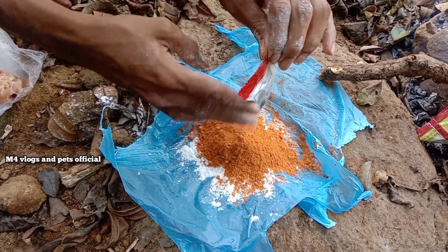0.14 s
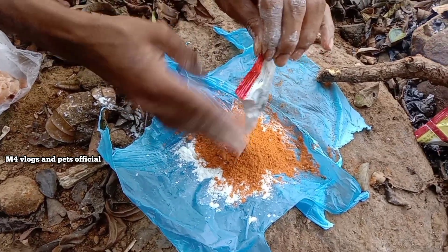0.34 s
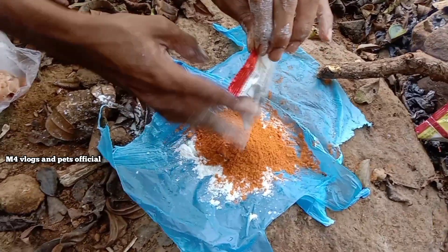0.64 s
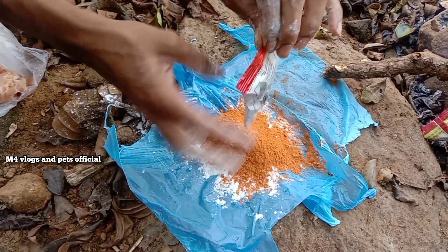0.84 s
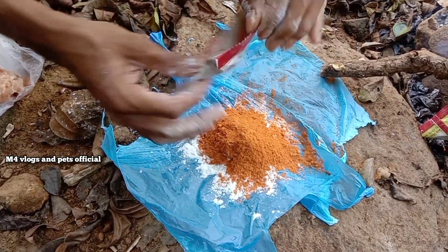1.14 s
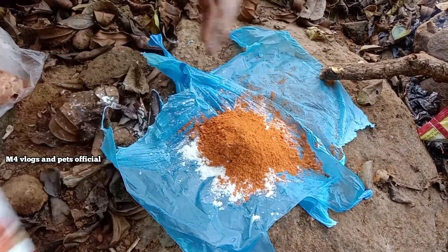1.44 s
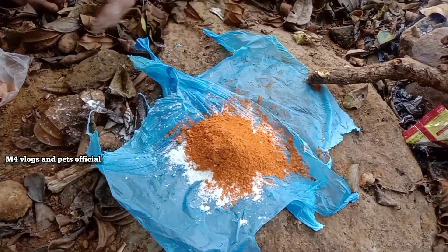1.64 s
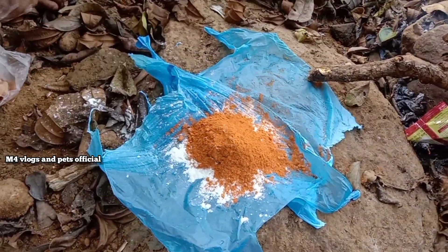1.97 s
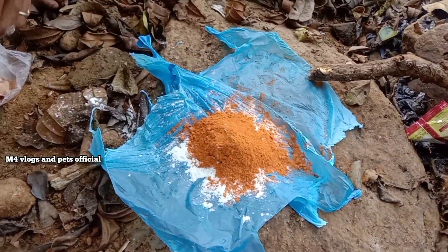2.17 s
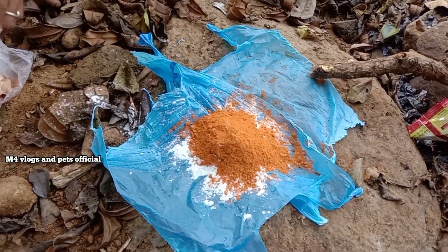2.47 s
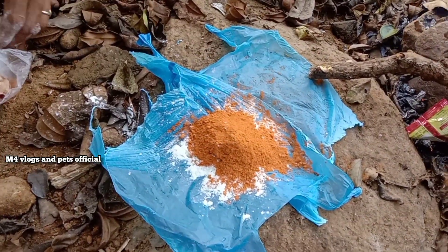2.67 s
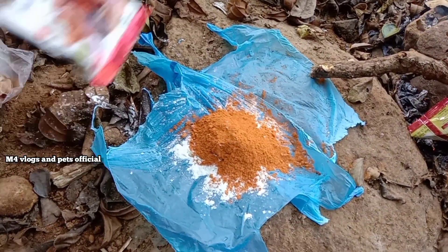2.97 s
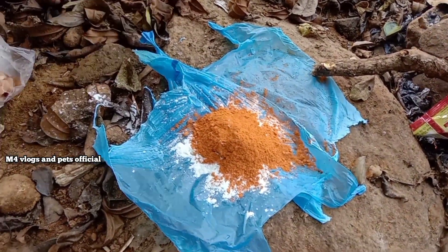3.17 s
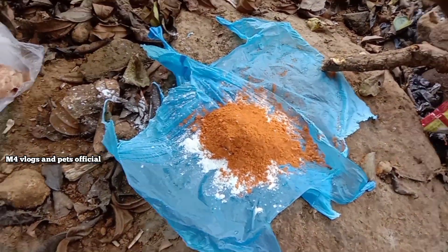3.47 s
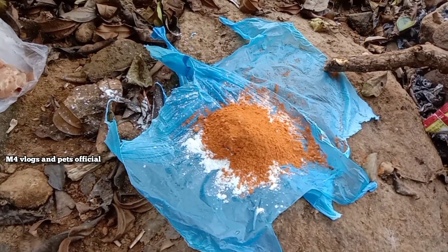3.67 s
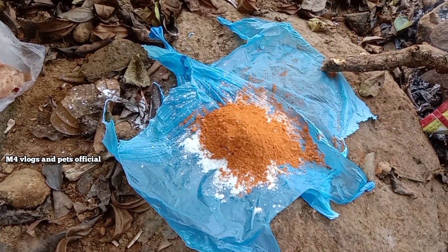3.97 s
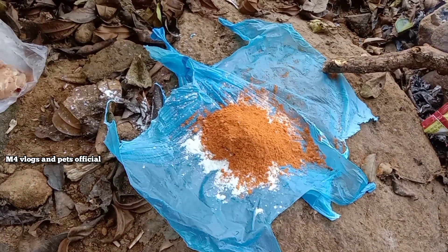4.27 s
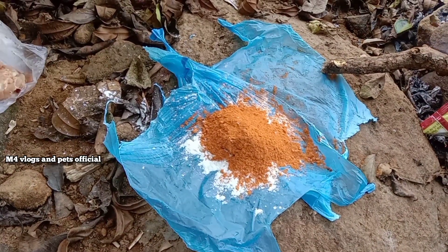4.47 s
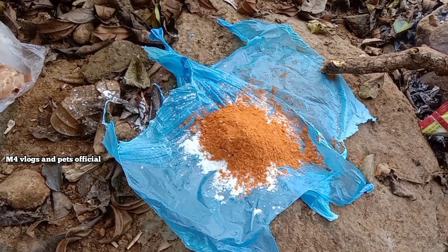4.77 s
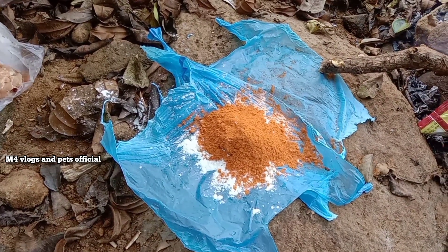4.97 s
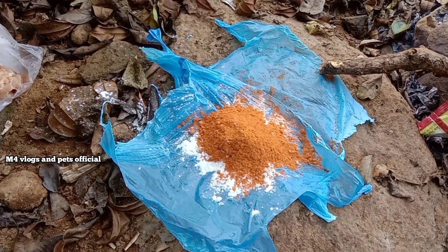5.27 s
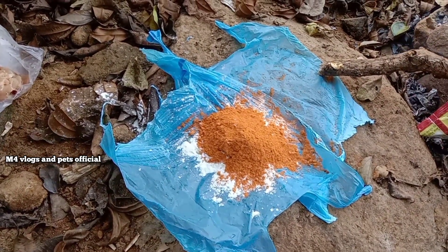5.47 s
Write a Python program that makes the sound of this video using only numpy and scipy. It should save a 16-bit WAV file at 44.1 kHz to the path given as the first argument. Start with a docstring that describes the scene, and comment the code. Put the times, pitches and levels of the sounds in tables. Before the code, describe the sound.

A quiet outdoor spot, recorded closely. A small plastic packet is flicked and shaken about six times a second, then crinkles in loose bursts with gaps between. It goes quiet for over a second, leaving faint high insect hiss. Finally a hand squeezes the film right by the microphone in dense, sharp crackling bursts, far louder than before.

```python
"""Crumpling a spice packet outdoors

A hand taps the last powder out of a plastic packet, lifts it away, then crumples it close by.
Snaps are short noise bursts with a ringing tone; the rustle is noise and random clicks
shaped by fixed ringing pitches. Behind are filtered noise for a light breeze and a thin hiss
of insects, a pulsed tone for one faint cricket, and a faint patchy noise."""
import sys
import numpy as np
from scipy import signal
from scipy.io import wavfile
from scipy.ndimage import map_coordinates

SR = 44100
rng = np.random.default_rng(int(sys.argv[2]) if len(sys.argv) > 2 else 0)


def waveform_to_disk(signal):
    """Save audio, clipped to [-1, 1], as 16-bit WAV at the path in sys.argv[1]."""
    frames = np.transpose(np.atleast_2d(signal))
    scaled = np.clip(frames, -1, 1) * 32767
    samples = np.round(scaled).astype(np.int16)
    wavfile.write(sys.argv[1], SR, samples)


N = 247842
TIME = np.arange(N) / SR

# Single snaps and tiny ticks of the film, before trim and ring:
# t/s, level/dB, ring f/Hz, treble over body/dB
SNAPS_AND_TICKS = [(0.109, -57, 8900, 18), (0.119, -58, 13300, 22), (0.1533, -23, 6060, 2),
                   (0.595, -57, 8900, 19), (0.716, -29.5, 3500, 4), (0.732, -30, 4020, -13),
                   (0.7632, -32.5, 2790, -12), (0.82, -38.5, 3650, 1), (1.071, -46.5, 1870, 1),
                   (1.126, -29, 3150, -5), (1.131, -30.5, 6900, -6.5), (1.189, -24, 3140, -5),
                   (1.229, -34.5, 2985, -14), (1.2483, -39.5, 3050, -8), (1.48, -43, 14000, 26),
                   (1.55, -52.5, 8430, 15), (1.714, -42, 7880, 26), (2.083, -31, 3030, -18),
                   (2.1042, -26, 2606, 1), (2.119, -28.5, 7360, -9), (2.2106, -30, 2870, -14),
                   (2.218, -30, 1550, -6), (2.507, -46, 2783, 21), (2.6, -33, 3350, -10),
                   (2.6265, -37, 1740, -10), (3.025, -32.5, 3650, -7), (3.0384, -37.5, 3792, -6),
                   (3.091, -26.5, 3940, 5), (3.108, -30, 3260, -5.5), (3.903, -52, 7840, 8),
                   (4.5067, -21, 3488, 5.5), (4.5375, -16.5, 2270, -5.5), (4.572, -26, 470, -2.5),
                   (4.668, -33.5, 1643, 6), (4.6785, -27.5, 6520, 1), (4.6984, -30, 1655, 18),
                   (4.8075, -26.5, 2200, 0), (4.861, -19.5, 2510, -2), (4.893, -20.5, 1318, -18.5),
                   (4.936, -15.5, 2185, 9.5), (4.9572, -18, 2400, 2), (4.9702, -18, 1750, -1),
                   (5.0139, -14, 2245, -11.5), (5.071, -19, 1140, -10.5), (5.25, -14, 1490, -16.5),
                   (5.426, -21.5, 2164, 3.5), (5.468, -23.5, 3400, 7), (5.546, -31, 3510, -3.5),
                   (5.5763, -32.5, 2710, -1)]
# Basic colour of the open packet: f/Hz, level per hertz/dB
OPEN_COLOUR = [(40, -27.5), (120, -24), (400, -8.5), (1000, -5.5), (1550, 1.5), (1950, -3.5), (2400, -1.5),
               (3700, 3), (4700, -4.5), (5500, -5.5), (6900, 3), (9400, -11), (11500, -13), (13000, -6)]
# Basic colour of the crushed packet: f/Hz, level per hertz/dB
CRUSHED_COLOUR = [(40, -63), (130, -17.5), (220, -21.5), (450, -9.5), (750, -5), (1350, 3), (2200, 3),
                  (3700, -1), (4700, -12.5), (6200, -7.5), (7700, -8.5), (9400, -21.5), (11300, -23.5),
                  (13000, -21)]
# Colour of the outdoor hiss: f/Hz, level per hertz/dB
HISS_COLOUR = [(100, -9), (1400, -10.5), (1900, -18.5), (3700, -26.5), (4500, -31), (6100, -26.5),
               (6700, -2.5), (7800, 0), (9400, -17), (11500, -16.5), (12300, -6)]
# Breeze on the microphone: t/s, level/dB
BREEZE_LEVEL = [(0, -71), (1.2, -80), (1.95, -79), (2.1, -55.5), (2.3, -72.5), (3.28, -59), (3.45, -75),
                (4.3, -66.5), (4.85, -51), (5.5, -68)]
# Colour of the breeze's rumble: f/Hz, level per hertz/dB
RUMBLE_COLOUR = [(25, -34.5), (70, -3), (140, 0), (260, -13.5), (1500, -57.5)]
# Gain of the packet's low sounds: t/s, level/dB
BODY_LEVEL = [(0.8, 1.5), (1.2, 3), (2.2, 4), (2.4, -9.5), (3.1, -13), (4.58, 3), (5.02, 2.5), (5.45, -5)]
# Fixed pitches that stand out in the sound: f/Hz
RESONANT_PITCHES = [1266, 1774, 2200, 2900, 3320, 3890, 5480, 7570]
# A finger taps, before trim: t/s, level/dB, ring f/Hz, rebound against tap/dB
FINGER_TAPS = [(0.001, -30.5, 1450, -5), (0.151, -24, 1630, -7.5), (0.304, -32, 1220, -2.5),
               (0.462, -36.5, 1110, -17.5), (0.657, -34, 4010, -14)]
# The packet is turned or shifted at arm's length: start t/s, length/s, level/dB
HAND_MOVES = [(0.483, 0.029, -53), (0.624, 0.03, -53.5), (0.672, 0.053, -47.5), (0.795, 0.04, -58.5),
              (1.041, 0.022, -58), (1.084, 0.049, -43), (1.15, 0.12, -59), (1.253, 0.025, -43),
              (2.012, 0.097, -48), (2.074, 0.14, -43), (2.303, 0.023, -58), (2.372, 0.086, -51.5),
              (2.501, 0.15, -55.5), (2.783, 0.032, -57.5), (2.933, 0.24, -59), (3.193, 0.08, -66)]
# The fist squeezes, before trim: start t/s, length/s, starting level/dB, treble over body/dB
FIST_SQUEEZES = [(4.337, 0.17, -50, -1), (4.475, 0.1, -30, -2), (4.652, 0.22, -35.5, -3.5),
                 (4.849, 0.096, -27.5, -5.5), (4.92, 0.1, -25, -1.5), (5.038, 0.23, -27.5, -4),
                 (5.273, 0.2, -25, -3.5), (5.501, 0.067, -46, -4)]
# The whole sheet buckles, level before its decay: t/s, level/dB
SHEET_KNOCKS = [(1.189, -36), (4.573, -25.5), (5.0136, -22.5)]
# Colour of these dull knocks: f/Hz, level per hertz/dB
KNOCK_COLOUR = [(60, -32), (130, -11.5), (210, -13), (320, -5), (750, 0), (1500, -15.5), (4000, -65.5)]

EDGE_HZ = 16000  # upper limit of the recorder
BODY_HZ = 1068  # top of the packet's low band
CLOSE_S = 4.33  # from here on the packet is crushed beside the microphone
DRAUGHT_DB = -30  # air pushed by the moving packet, against its rustle
REBOUND_S, REBOUND_HZ = 0.036, 3930  # the packet swings back against the fingers
TAP_TREBLE_DB, TAP_DECAY_S = -1.5, 0.0056
# Loose film and powder settle after each tap; the level is against the tap
SHAKE_DB, SHAKE_RISE_S, SHAKE_FADE_DB_PER_S = -11.5, 0.004, 291
MOVE_RISE_S, MOVE_FADE_DB_PER_S = 0.014, 377
# The film rubs as it strains around a snap or a tap; the level is against that event
STRAIN_DB, STRAIN_S = -17.5, 0.0025
SQUEEZE_RISE_S, TIGHTEN_DB_PER_S, RELAX_DB_PER_S = 0.028, 20.5, 316
OPEN_DECAY_S, CRUSHED_DECAY_S = 0.0031, 0.0019
# Stray creases: chances a second, and level against the rustle around them
STRAY_CHANCES_PER_S, STRAY_DB, STRAY_SPREAD_DB = 42, -0.5, 0.5
STRAY_TREBLE_DB, STRAY_TREBLE_SPREAD_DB = -6.5, 8
KNOCK_DECAY_S = 0.0077


def gain_of(db):
    """Turns decibels into amplitude."""
    return 10 ** (np.asarray(db) / 20)


def evened(x):
    """Scales a sound to an average strength (rms) of 1."""
    return x / np.sqrt(np.mean(x ** 2) + 1e-20)


def follow(rows):
    """Reads each column of a curve at every sample, with straight lines between its points."""
    s, *columns = np.transpose(rows)
    return [np.interp(TIME, s, column) for column in columns]


def add(mix, s, sound):
    """Lays a sound into the mix at time s, cut off at the end."""
    part = mix[max(round(s * SR), 0):][:len(sound)]
    part += sound[:len(part)]


def colour(x, points, size=2048):
    """Filters to the given spectrum without sounding ahead of time, so attacks stay sharp."""
    hz, db = np.transpose(points)
    f = abs(np.fft.fftfreq(size, 1 / SR))
    curve_db = np.interp(np.log(f + 1), np.log(hz), db)
    log_gain = np.log(gain_of(curve_db))
    # The Hilbert transform finds the phase that puts the energy as early as possible
    spectrum = np.exp(np.conj(signal.hilbert(log_gain)))
    response = np.fft.ifft(spectrum).real
    return signal.fftconvolve(x, response[:size // 2])[:len(x)]


def brighten(x, treble_db, split_hz=5000):
    """Sets the share of treble against body, for a result of about rms 1."""
    lowpass = signal.butter(3, split_hz, fs=SR, output="sos")
    body = signal.sosfiltfilt(lowpass, x)
    treble = gain_of(treble_db)
    return (evened(body) + treble * evened(x - body)) / np.sqrt(1 + treble ** 2)


def wander(rate, size=8192):
    """Drifts at random around zero, with rate fresh values a second and rms 1."""
    values = rng.standard_normal(size)
    return evened(map_coordinates(values, [TIME * rate], order=2, mode="wrap"))


def ring_and_patch(x, ring_db, bend_db, bends_per_s, width_hz=110, patch_hz=230, size=512):
    """Fixed pitches ring; patches of colour come and go."""
    overlap = size * 3 // 4
    hz, t, z = signal.stft(x, SR, nperseg=size, noverlap=overlap)
    ringing = sum(np.exp(-((hz - f) / width_hz) ** 2) for f in RESONANT_PITCHES)[:, None]
    grid = np.meshgrid(hz / patch_hz, t * bends_per_s, indexing="ij")
    values = rng.standard_normal((256, 1024))
    patches = evened(map_coordinates(values, grid, order=1, mode="wrap"))
    depth_db = bend_db / (1 + (hz[:, None] / 9000) ** 2)  # patches are weaker in the treble
    z = z * gain_of(ring_db * ringing + depth_db * np.minimum(patches, 2))
    shaped = signal.istft(z, SR, nperseg=size, noverlap=overlap)[1][:N]
    return evened(shaped) * np.std(x)  # keeps the strength it came in with


def faint_patchy_noise():
    """A faint, patchy background noise with soft tones that come and go."""
    noise = colour(rng.standard_normal(N), OPEN_COLOUR)
    patchy = ring_and_patch(noise, ring_db=8, bend_db=9.5, bends_per_s=12)
    return gain_of(-74.5) * evened(patchy * gain_of(2 * wander(21.98)))


def cricket(hz=6850, width_hz=420, chirps_per_s=4.6, first_s=0.1, pulses_per_s=70, db=-78):
    """A far, slightly blurred tone swells in chirps, each made of quick wing strokes."""
    chirp = np.cos(np.pi * chirps_per_s * (TIME - first_s)) ** 2
    strokes = np.cos(np.pi * pulses_per_s * TIME) ** 2
    tone = wander(width_hz) * np.sin(2 * np.pi * hz * TIME)
    return gain_of(db) * evened(chirp * strokes * tone)


def outdoors(stir):
    """A thin flickering hiss, and lumpy rumble from the breeze and air pushed by the packet."""
    breeze_db, = follow(BREEZE_LEVEL)
    hiss = colour(rng.standard_normal(N), HISS_COLOUR)
    hiss = evened(hiss * gain_of(1.0 * wander(56)))
    rumble = colour(rng.standard_normal(N), RUMBLE_COLOUR, size=8192)
    rumble = evened(rumble * gain_of(2.6 * wander(17)))
    wind = np.hypot(gain_of(breeze_db), gain_of(DRAUGHT_DB) * stir)  # adds up in power
    return gain_of(-69.5) * hiss + wind * rumble


def scatter(x, t60=0.11, delay=0.00307, size=12000):
    """A short tail of fading noise lingers in the film and among the stones."""
    t = np.arange(size) / SR
    tail = rng.standard_normal(size) * gain_of(-60 * t / t60) * (t > delay)
    wet = signal.fftconvolve(x, tail / np.linalg.norm(tail))[:N]
    return ring_and_patch(wet, ring_db=3, bend_db=5.5, bends_per_s=12)


def stroke(start, length, rise_s, fade_db_per_s, swell_db_per_s=0):
    """Gain of one hand movement: it rises, holds or swells, then dies away."""
    t = TIME - start
    db = swell_db_per_s * np.clip(t, 0, length) - fade_db_per_s * np.maximum(t - length, 0)
    return np.clip(t / rise_s, 0, 1) * gain_of(np.maximum(db, -150))


def straining(s, db):
    """Gain of the film's rub, which peaks at a snap or tap and falls off on both sides."""
    distance = np.minimum(abs(TIME - s) / STRAIN_S, 15)
    return gain_of(db + STRAIN_DB - 8.7 * distance)


def stirring():
    """Gain of the open packet's rustle: taps, turns and strain add up in power."""
    taps = [gain_of(db + SHAKE_DB) * stroke(s, 0, SHAKE_RISE_S, SHAKE_FADE_DB_PER_S)
            for s, db, _, _ in FINGER_TAPS]
    moves = [gain_of(db) * stroke(s, length, MOVE_RISE_S, MOVE_FADE_DB_PER_S)
             for s, length, db in HAND_MOVES]
    strain = sum(straining(s, db) for s, db, _, _ in FINGER_TAPS + SNAPS_AND_TICKS if s < CLOSE_S)
    return np.linalg.norm(taps + moves + [strain], axis=0)


def squeezing():
    """Gain and treble of the crushed packet: each squeeze tightens, then relaxes."""
    gains = [gain_of(db) * stroke(s, length, SQUEEZE_RISE_S, RELAX_DB_PER_S, TIGHTEN_DB_PER_S)
             for s, length, db, _ in FIST_SQUEEZES]
    power = np.array(gains) ** 2
    total = power.sum(0)
    treble_db = np.array(FIST_SQUEEZES)[:, 3] @ power / (total + 1e-30)  # the strongest counts most
    return np.sqrt(total), treble_db


def crackle(per_s, spread_db, clump_db, clump_rate, rub):
    """Tiny buckles of uneven size come in clumps, over the hiss of film rubbing on film."""
    size = gain_of(spread_db * np.minimum(rng.exponential(1, N), 3.4))
    clicks = size * rng.choice([-1, 1], N) * (rng.random(N) < per_s / SR)
    rubbed = evened(clicks) + rub * rng.standard_normal(N)
    return evened(rubbed * gain_of(clump_db * wander(clump_rate)))


def handling(stir):
    """Loose film and powder rustle with each tap, turn and strain, with patches of colour."""
    buckles = crackle(per_s=1400, spread_db=3.6, clump_db=1.8, clump_rate=140, rub=.8)
    rung = ring_and_patch(colour(buckles, OPEN_COLOUR), ring_db=1.5, bend_db=7.5, bends_per_s=32)
    return stir * evened(rung)


def snap(db, hz, treble_db, decay, film, rise, crack, ring, ring_decay, span=0.0047, size=2048):
    """A crease flips with a short run of slips, an optional crack and a brief ringing tone."""
    t = np.arange(size) / SR
    envelope = (1 - np.exp(-t / rise)) * np.exp(-t / max(decay, 1e-4))
    slips = evened(rng.standard_normal(size) * envelope)
    edge = evened(signal.unit_impulse(size))
    tone = evened(np.sin(2 * np.pi * hz * t) * t * np.exp(-t / ring_decay))
    burst = brighten(colour(slips + crack * edge, film), treble_db)
    sound = evened(burst + ring * tone)
    return gain_of(db) * sound * np.sqrt(span * SR / size)  # as much energy as span seconds at db


def tapping():
    """Each tap slaps the film, and the packet rebounds a moment later; fixed pitches ring in both."""
    out = np.zeros(N)
    for s, db, hz, rebound_db in FINGER_TAPS:
        for delay, level_db, ring_hz in (0, db, hz), (REBOUND_S, db + rebound_db, REBOUND_HZ):
            slap = snap(level_db, ring_hz, TAP_TREBLE_DB, TAP_DECAY_S, OPEN_COLOUR,
                        rise=.003, crack=0, ring=0.64, ring_decay=.0012)
            add(out, s + delay, gain_of(-2.0) * slap)
    return ring_and_patch(out, ring_db=1.5, bend_db=1, bends_per_s=22, patch_hz=330, size=256)


def knocks(size=4096):
    """The whole sheet gives a short, low shudder: dull noise that dies away fast."""
    out, t = np.zeros(N), np.arange(size) / SR
    for s, db in SHEET_KNOCKS:
        shudder = evened(colour(rng.standard_normal(size), KNOCK_COLOUR))
        add(out, s, gain_of(db) * shudder * np.exp(-t / KNOCK_DECAY_S))
    return out


def crumpling(squeeze, treble_db):
    """The fist closes: dense buckling all over the film."""
    buckles = crackle(per_s=1700, spread_db=4.7, clump_db=1.4, clump_rate=190, rub=.5)
    rung = ring_and_patch(colour(buckles, CRUSHED_COLOUR), ring_db=0.5, bend_db=3.0, bends_per_s=65,
                          patch_hz=392, size=128)
    return squeeze * gain_of(-1.5) * brighten(rung, treble_db)


def crease(s, db, hz, treble_db):
    """Slips of the open packet swell and last longer; the crushed one snaps short and sharp."""
    if s < CLOSE_S:
        return snap(db - 3.0, hz, treble_db, OPEN_DECAY_S, OPEN_COLOUR,
                    rise=0.0014, crack=0, ring=0.95, ring_decay=.0014)
    return snap(db - 1.24, hz, treble_db, CRUSHED_DECAY_S, CRUSHED_COLOUR,
                rise=.0002, crack=0.54, ring=0.77, ring_decay=0.0016)


def creases(rustle, count=400):
    """The listed snaps and ticks, and stray ones at random wherever the film is moving."""
    out = np.zeros(N)
    for row in SNAPS_AND_TICKS:
        add(out, row[0], crease(*row))
    for k, (when, size, pitch, bright) in enumerate(rng.random((count, 4))):
        s = (k + when) / STRAY_CHANCES_PER_S
        if s < TIME[-1] and rustle[int(s * SR)] > 1e-3:
            rustle_db = 20 * np.log10(rustle[int(s * SR)])
            db = rustle_db + STRAY_DB + STRAY_SPREAD_DB * (2 * size - 1)
            hz = RESONANT_PITCHES[int(pitch * len(RESONANT_PITCHES))]
            treble_db = STRAY_TREBLE_DB + STRAY_TREBLE_SPREAD_DB * (2 * bright - 1)
            add(out, s, crease(s, db, hz, treble_db))
    return out


def scene():
    """Adds up the packet, its tail and the background."""
    stir = stirring()
    squeeze, treble_db = squeezing()
    background = outdoors(stir) + cricket()
    packet = handling(stir) + crumpling(squeeze, treble_db) + tapping() + creases(stir + squeeze)
    packet = packet + faint_patchy_noise()  # shares the low-band gain and the tail
    body_db, = follow(BODY_LEVEL)
    low = signal.sosfiltfilt(signal.butter(2, BODY_HZ, fs=SR, output="sos"), packet)
    packet = packet + (gain_of(body_db) - 1) * low + knocks()
    wet = np.where(TIME > CLOSE_S, .5, 1)  # close to the microphone the packet sounds drier
    return (packet + gain_of(-11.5) * scatter(wet * packet) + background)[None]


def record(dry):
    """The microphone cuts the lowest sounds and the recorder limits the highest."""
    low_cut = signal.butter(2, 50, "highpass", fs=SR, output="sos")
    cut = signal.sosfilt(low_cut, dry)
    band_limit = signal.firwin(511, EDGE_HZ, window=("kaiser", 9), fs=SR)
    return signal.oaconvolve(cut, band_limit[None], "same")


dry = scene()
out = record(dry)
waveform_to_disk(out)
```